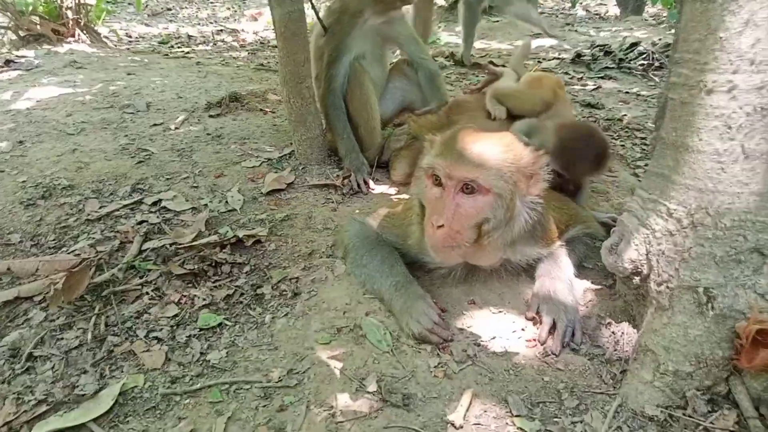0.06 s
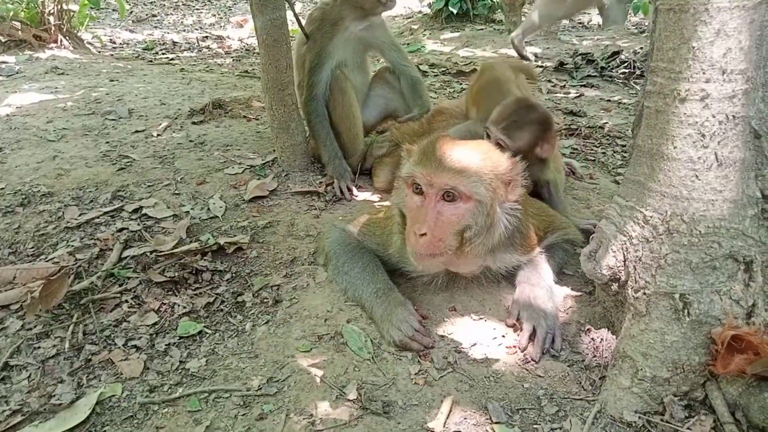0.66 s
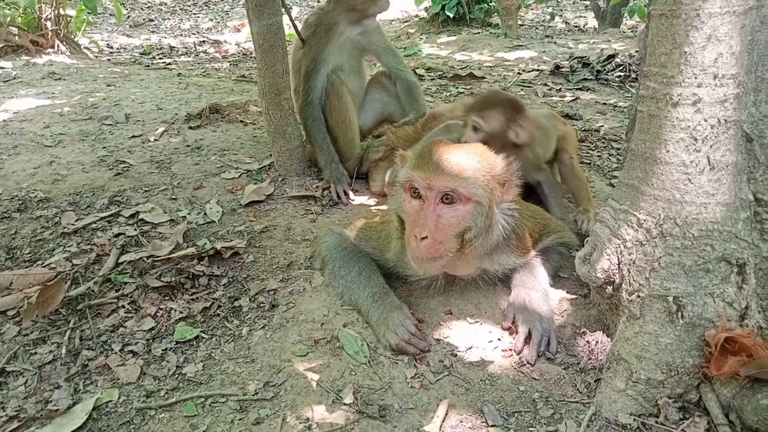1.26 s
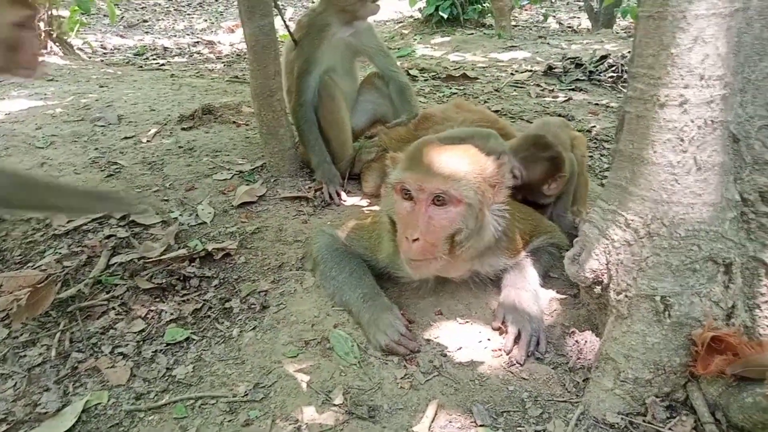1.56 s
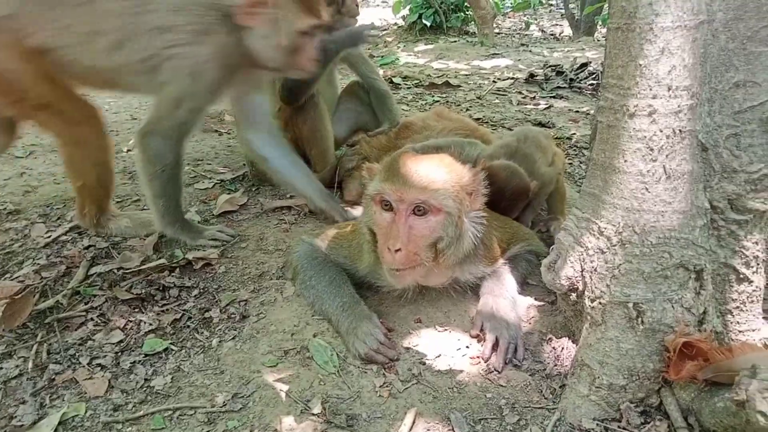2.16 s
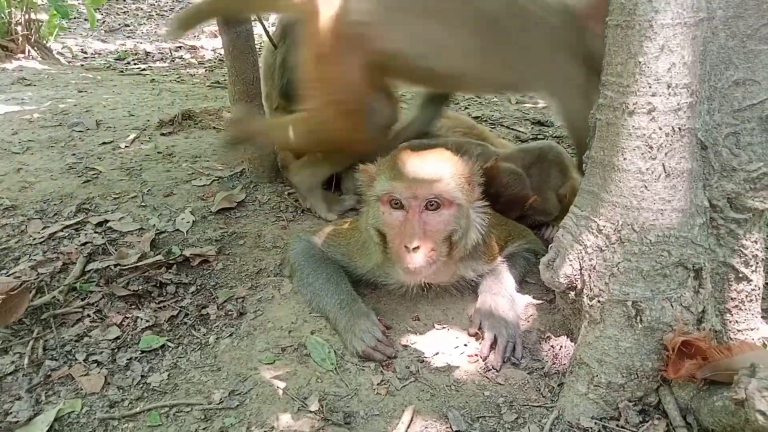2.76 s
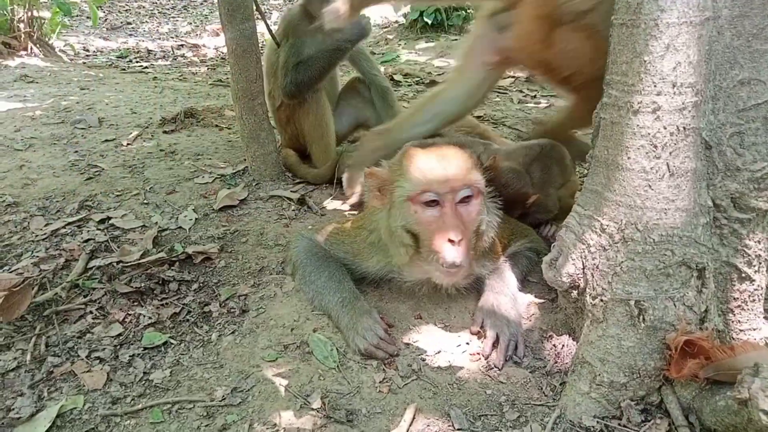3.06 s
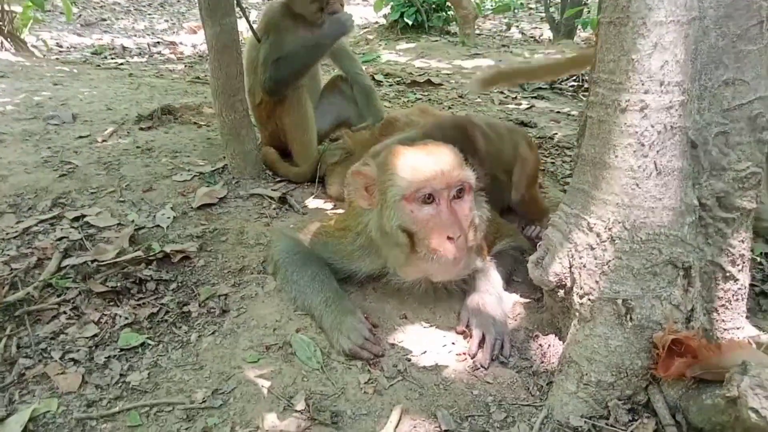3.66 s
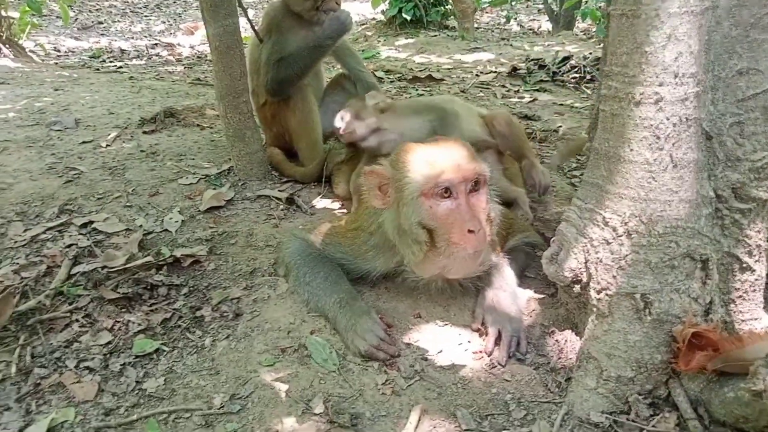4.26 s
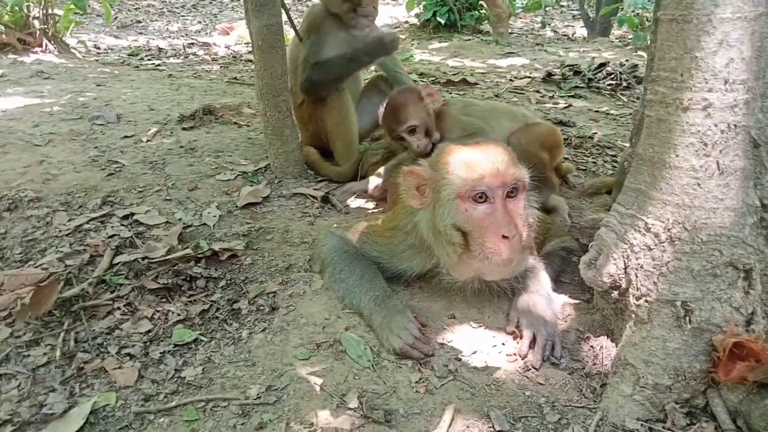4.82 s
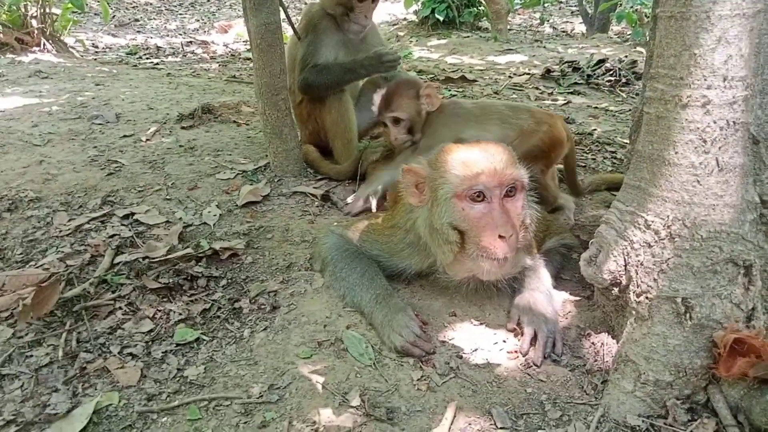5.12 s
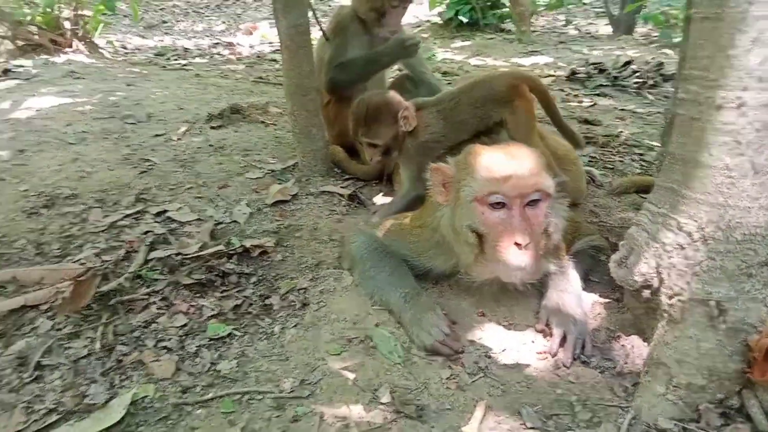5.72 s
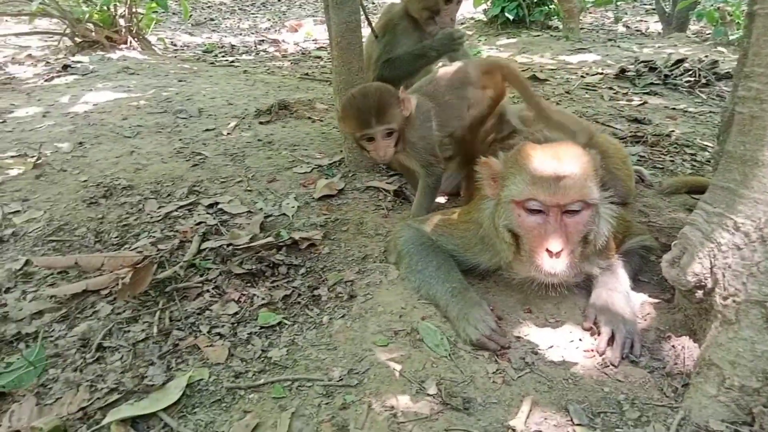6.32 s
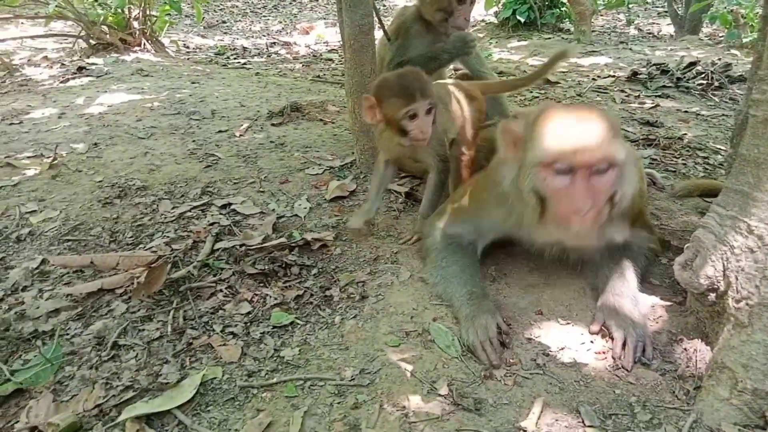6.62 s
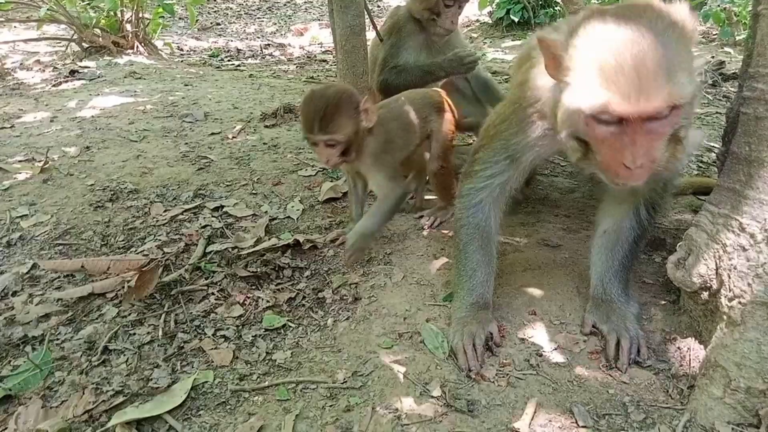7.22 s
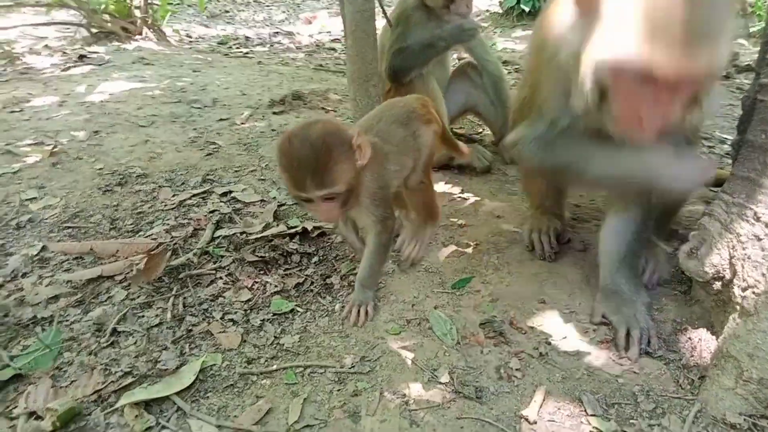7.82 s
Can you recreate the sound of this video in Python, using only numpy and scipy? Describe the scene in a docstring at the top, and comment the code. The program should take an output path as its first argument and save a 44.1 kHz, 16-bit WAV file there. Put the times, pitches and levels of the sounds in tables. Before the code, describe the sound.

Monkeys shuffle close by on a forest floor, with light scuffs, crackling dry leaves and scattered twig snaps throughout. The sharpest snap comes at about 0.8 seconds, with others around 2, 4.3, 5 to 5.3 and 6.5 seconds, and a louder stick crack near 7 seconds. A nearby bird gives nine short whistles, roughly one a second, alternating arched and falling notes, each with a brief echo. A small bird fires three very quick high chips at about 1 second and again at 5.3. A farther bird slides steeply down three times between 1 and 2 seconds, and another repeats a short phrase four times from 6.8 to 8. A distant flock twitters faintly over a quiet low rumble and airy hiss. A thin faraway whistle swells around 6 seconds, followed by a faint low hum until just after 7.

```python
"""Monkeys and birds under the trees

Monkeys shuffle about on dry leaves, which crackle, and on twigs, which snap. A near bird repeats
arched and falling whistles, others answer from deeper in the wood, a small one gives two runs of
quick chips, and a far flock twitters. The trunks scatter every call into a short tail of echoes.
A low rumble, an airy hiss, a thin whistle and a faint hum come from far away."""
import sys
import numpy as np
from scipy import signal
from scipy.fft import rfft, irfft
from scipy.io import wavfile

SR = 44100
rng = np.random.default_rng(int(sys.argv[2]) if len(sys.argv) > 2 else 0)


def int16_out(signal):
    """Quantize to a 16-bit WAV file."""
    q = np.round(np.clip(np.atleast_2d(signal).T, -1, 1) * 32767)
    wavfile.write(sys.argv[1], SR, q.astype(np.int16))


N = 356328
TIME = np.arange(N) / SR

# The throat's resonance favours the second harmonic. Each row: frequency in Hz, gain in dB.
THROAT_RESONANCE = [(1500, -24), (1850, -8), (2150, -11), (2400, 6.5), (3000, -9.5), (3700, 0),
                    (4200, -0.5), (4500, -16.5), (4900, -18.5), (5800, -14.5), (6800, -25.5), (8700, -9.5),
                    (9600, -67)]
# Foliage takes the treble out of the top harmonic. Each row: frequency in Hz, gain in dB.
FOLIAGE_LOSS = [(6000, 0), (8000, -5)]
# Notes that rise, then drop. Each row: start in seconds, top pitch in Hz, level in dB, swell in dB.
ARCHED_NOTES = [(.185, 1942, -43.5, 4.5), (2.123, 1838, -42.5, 9.5), (3.52, 1862, -42.5, 17),
                (5.258, 1867, -41, 11), (7.819, 1787, -40.5, 1)]
# Notes that only drop. Each row: start in seconds, top pitch in Hz, level in dB, swell in dB,
# linger (above 1, the note stays high for longer).
FALLING_NOTES = [(1.547, 2298, -39, 5, 1.05), (2.903, 2422, -39, 0, 1.07), (4.653, 2314, -37.5, 5.5, .9),
                 (7.305, 2296, -38.5, 0.5, 0.94)]

def near_bird():
    """Harmonics (multiples of the pitch) light up as they slide through the throat's resonance."""
    arch = np.array([.915, .99, .97, .91, .805])  # shares of the top pitch
    fall = np.array([.99, .96, .885, .775, .675])
    steps = np.linspace(0, 1, len(fall))
    notes = [(start, .148, top_hz * arch, db, swell_db, -2.5)
             for start, top_hz, db, swell_db in ARCHED_NOTES]
    notes += [(start, .168, top_hz * np.interp(steps ** linger, steps, fall), db, swell_db, -5)
              for start, top_hz, db, swell_db, linger in FALLING_NOTES]
    whistle, overtones = np.zeros(N), np.zeros(N)
    for start, length, pitches, db, swell_db, first_db in notes:
        hz, phase, loudness = note(length, pitches, swell_db, rasp=.013, attack_s=.03, release_s=.022)
        first, second, third, fourth = [
            from_db(db) * loudness * gain_at(THROAT_RESONANCE, k * hz) * np.sin(k * phase)
            for k in range(1, 5)]
        add(whistle, start, second + first * from_db(first_db + 2.5 * drift(200, len(hz))))
        add(overtones, start, third + fourth * gain_at(FOLIAGE_LOSS, 4 * hz))
    # The highest harmonics reach us mainly by bouncing off the foliage.
    direct = whistle + .22 * overtones
    echoes = from_db(-2.4) * tree_echoes(whistle + .55 * overtones, early_db=2)
    return from_db(1.24) * (direct + echoes)


# A second bird slides steeply down. Each row: start in seconds, length in seconds, first pitch in Hz,
# level in dB, swell in dB, pitch in Hz of the thin note that leads in.
SLIDING_CALLS = [(1.166, .1, 3824, -49, 4.5, 4610), (1.435, 0.093, 3943, -51.5, -20, 4330),
                 (1.735, .065, 3600, -52.5, -16, 4390)]
# A third bird repeats a phrase. Each row: start in seconds, level in dB, rasp of the main note.
REPEATED_PHRASES = [(6.778, -50, 0.039), (7.22, -50, 0.02), (7.599, -51, 0.045), (7.958, -43, 0.016)]
# Stray hoarse calls. Each row: start in seconds, length in seconds, first and last pitch in Hz,
# level in dB.
HOARSE_CALLS = [(1.337, 0.038, 3150, 3970, -53), (2.005, .061, 1400, 1586, -63.5),
                (2.352, 0.037, 1430, 1385, -64.5), (3.43, 0.083, 2550, 3120, -64),
                (3.545, 0.1, 2970, 2500, -60), (3.825, 0.045, 1737, 2174, -54),
                (5.012, 0.062, 2030, 2165, -61), (6.392, 0.13, 3264, 2630, -57.5),
                (6.478, 0.041, 2645, 1960, -56.5)]

def far_birds():
    """Calls from deeper in the wood arrive mostly as echoes."""
    calls = np.zeros(N)
    lead_in, slide = np.array([.93, 1.003, .995, .86]), np.array([1, .715, .54, .47])
    for start, length, hz, db, swell_db, lead_hz in SLIDING_CALLS:
        add(calls, start - .068, far_note(.12, lead_hz * lead_in, db=-64, rasp=.0099))
        add(calls, start, far_note(length, hz * slide, db, rasp=.018, swell_db=swell_db))
    for start, db, rasp in REPEATED_PHRASES:
        opening = far_note(.079, [3070, 3190, 3266, 3180], db - 6, rasp=.019)
        main_note = far_note(.0954, [2930, 2940, 2870, 2820], db, rasp)
        lower_voice = far_note(.1, [2586, 2460, 2310, 2200], db - 7, rasp=.11, swell_db=-9)
        add(calls, start, opening)
        add(calls, start + .062, main_note)
        add(calls, start + .062, lower_voice)
    for start, length, first_hz, last_hz, db in HOARSE_CALLS:
        add(calls, start, far_note(length, [first_hz, last_hz], db, rasp=.06))
    return from_db(3) * calls + from_db(4.5) * tree_echoes(calls, early_db=-.5)


# Two runs of three chips. Each row: start in seconds, level in dB.
CHIP_NOTES = [(.909, -50), (.937, -37.5), (.966, -37), (5.252, -48), (5.283, -38), (5.313, -37)]

def small_bird():
    """Each chip is a very fast downward sweep, and each run grows louder."""
    chips = np.zeros(N)
    pitches_hz = [6150, 5800, 4970, 4450]
    for start, db in CHIP_NOTES:
        _, phase, loudness = note(.018, pitches_hz, 0, rasp=.019, attack_s=.011, release_s=.013)
        add(chips, start, from_db(db) * loudness * np.sin(phase))
    return chips + from_db(-7.5) * tree_echoes(chips, early_db=6, tail_s=.16)


# Things that break. Each row: start in seconds, peak level in dB, ring pitch in Hz, ring width in Hz.
TWIG_SNAPS = [(0.1115, -33, 2980, 3000), (0.2772, -40, 4500, 4000), (.577, -33.5, 2800, 2500),
              (0.6832, -36, 3500, 790), (0.7627, -24, 3030, 1920), (1.702, -41, 4960, 3970),
              (1.928, -33, 6900, 1180), (1.941, -41, 3970, 3520), (1.9952, -46, 7400, 1470),
              (3.4903, -44, 8260, 2050), (4.265, -35.5, 4270, 4830), (4.431, -41.5, 5900, 1200),
              (5.019, -31, 6530, 3340), (5.0296, -31, 3580, 400), (5.305, -33.5, 1100, 460),
              (5.3059, -32.5, 2900, 1500), (6.451, -37, 4100, 1110), (6.4877, -43.5, 7740, 2000),
              (6.505, -39, 4040, 800), (7.7546, -51.5, 7650, 1500), (7.833, -38, 6000, 5000),
              (7.835, -44, 700, 700)]
# The ways one stiff stick rings. Each row: pitch in Hz, relative level in dB, width in Hz.
STICK_RINGS = [(1260, -15.5, 1700), (3080, -6.5, 2300), (7170, -2.5, 350), (8240, -1.5, 900)]

def snapping_twigs():
    """Twigs and dry leaves give way under paws; a stick cracks as the big monkey gets up."""
    snaps = np.zeros(N)
    for start, db, hz, width_hz in TWIG_SNAPS:
        add(snaps, start, snap(db, hz, width_hz))
    for hz, db, width_hz in STICK_RINGS:
        add(snaps, start=6.9355, sound=snap(db - 19, hz, width_hz))
    return snaps + from_db(-12.5) * tree_echoes(snaps, early_db=8, tail_s=.4)


# Scuffs on the ground. Each row: start in seconds, stroke length in seconds, level in dB,
# brightness in dB (light brushes hiss, heavy steps crunch).
PAW_SCUFFS = [(0.112, 0.042, -59.5, -2.5), (.163, .019, -63, -1), (.264, 0.091, -67, -11),
              (0.569, .017, -67, -6), (1.031, 0.034, -65.5, -10), (1.69, 0.047, -60.5, -0.5),
              (1.921, 0.024, -67, -4), (2.097, 0.018, -63.5, -3), (2.794, .027, -67.5, 3.5),
              (3.164, 0.052, -56, 1), (3.617, 0.069, -72.5, -10), (3.745, 0.036, -60, 2.5),
              (4.055, 0.04, -59, 7.5), (4.257, .047, -62, -1), (4.318, 0.059, -60.5, 6.5),
              (5.857, 0.073, -72.5, 5), (6.131, 0.063, -75, 11), (6.219, 0.039, -64.5, 8),
              (6.681, 0.045, -67, -2), (6.774, 0.061, -68.5, 4), (6.95, .085, -62, 7.5),
              (7.15, .037, -62.5, 0), (7.831, 0.011, -59, 3)]
# A scuff's thud, crunch, crackle and hiss. Each row: low and high edge in Hz, gain in dB,
# share of the brightness added to that gain.
SCUFF_LAYERS = [(200, 530, -3, -1.1), (580, 4000, 7, -0.95), (6160, 8700, -1, 0.32), (9600, 33000, -6.5, 1)]

def scuffing_paws():
    """Paws and bodies brush dry leaves; large and small pieces crackle in clumps that swell and die."""
    scuffs = np.zeros(N)
    for start, length, db, bright_db in PAW_SCUFFS:
        progress = np.arange(16384) / SR / length
        stroke = np.minimum(progress / .26, 1) * np.exp(-np.maximum(progress - .8, 0) / .45)
        clumps_db = 3.4 * drift(210, len(stroke))
        for low_hz, high_hz, layer_db, share in SCUFF_LAYERS:
            crunch = grains(len(stroke), spread_db=2.3)
            crunch *= from_db(clumps_db + 1.8 * drift(300, len(stroke)))
            layer = unit_level(band_pass(crunch, low_hz, high_hz))
            add(scuffs, start, from_db(db + layer_db + share * bright_db) * stroke * layer)
    return scuffs + from_db(-35) * tree_echoes(scuffs, early_db=-4, tail_s=.6)


# How strongly the fallen leaves stir. Each row: time in seconds, relative level in dB.
STIR_LEVELS = [(0.0, -71), (0.25, -75.5), (0.36, -80.5), (1.69, -85), (1.89, -86), (2.25, -84), (3.56, -85),
               (3.89, -79), (4.84, -82), (5.24, -87.5), (5.67, -82.5), (6.14, -83), (6.53, -84),
               (6.77, -97), (6.93, -75), (7.04, -77), (7.18, -85), (8.08, -89)]
# The tone of their crackle. Each row: frequency in Hz, gain in dB.
CRACKLE_TONE = [(500, -7), (2000, 13.5), (4000, 1.5), (8000, 8), (10500, -15), (14500, 6.5), (16000, -5.5)]

def stirring_leaves(tick_count=420):
    """Leaves crackle as they shift in small bursts, and single stiff ones tick at their own pitch."""
    ticks = np.zeros(N)
    low_hz, high_hz = 3000, 8500
    for when, strength, pitch in rng.random((tick_count, 3)):
        hz = low_hz * (high_hz / low_hz) ** pitch
        add(ticks, when * N / SR, snap(15.5 + 19.5 * strength ** 2, hz, width_hz=2500))
    bursts_db = 9 + 5 * drift(24, N)
    crackle = from_db(bursts_db) * with_tone(grains(N, spread_db=3.8), CRACKLE_TONE)
    level_db, = curves(STIR_LEVELS)
    return from_db(level_db) * (crackle + ticks)


# How strongly the flock twitters. Each row: time in seconds, relative level in dB.
FLOCK_LEVELS = [(0, -64), (.35, -82), (.52, -61), (1.6, -72), (2.85, -65), (3.3, -71), (3.65, -58),
                (4.3, -73), (4.9, -63.5), (5.55, -77), (5.65, -58.5), (5.8, -73), (7.1, -63), (8.08, -68)]

def far_flock(chirp_count=600):
    """Many tiny high chirps, blurred by distance."""
    chirps = np.zeros(N)
    for when, stretch, pitch in rng.random((chirp_count, 3)):
        length = .021 + .0382 * stretch
        pitches_hz = (5300 + 1000 * pitch) * np.array([1.04, 1, .96])
        _, phase, loudness = note(length, pitches_hz, 0, rasp=.0363, attack_s=.03, release_s=.0019)
        add(chirps, when * N / SR, loudness * np.sin(phase))
    level_db, = curves(FLOCK_LEVELS)
    return from_db(level_db - 5.5) * unit_level(tree_echoes(chirps, early_db=39, tail_s=.2))


# The far background. Each row: time in seconds, relative levels of rumble and of air in dB.
BACKGROUND_LEVELS = [(0.0, -61, -67), (0.22, -57.5, -63), (1.53, -57, -64.5), (2.79, -59.5, -67),
                     (3.08, -53, -62), (3.4, -59, -66), (5.4, -53.5, -64.5), (5.78, -60.5, -68),
                     (6.19, -57, -66.5), (6.88, -55.5, -64.5), (7.43, -56, -63.5), (8.08, -54, -64.5)]
# The tones of the rumble and the air. Each row: frequency in Hz, gain in dB.
RUMBLE_TONE = [(12, -51), (25, -43), (35, -38), (50, -8), (64, 0.5), (85, 2), (120, -2), (170, -6.5),
               (260, -15), (450, -58)]
AIR_TONE = [(120, 1), (250, 7), (500, 2), (900, -2), (2000, -2.5), (3200, -2), (4600, -13.5), (5700, -11),
            (7000, -29.5), (9000, -19), (10500, -32.5), (16000, -32)]

def rumble_and_air():
    """A low rumble and an airy hiss slowly rise and fall."""
    rumble_db, air_db = curves(BACKGROUND_LEVELS)
    rumble = from_db(rumble_db + .6) * with_tone(rng.standard_normal(N), RUMBLE_TONE)
    air = from_db(air_db + 5.5) * with_tone(rng.standard_normal(N), AIR_TONE)
    return rumble + air


# The whistle's path. Each row: time in seconds, pitch in Hz, relative level in dB.
WHISTLE_PATH = [(5.75, 1255, -56), (5.95, 1265, -50), (6.1, 1417, -45), (6.22, 1344, -49), (6.4, 1390, -53),
                (6.6, 1380, -61), (6.7, 1360, -99)]

def far_whistle():
    """One thin tone, heard only as echoes, holds faintly, then swells, rises and dies away."""
    hz, db = curves(WHISTLE_PATH)
    return tree_echoes(from_db(db - 18) * np.sin(phase_of(hz)), early_db=28)


# The hum's path. Each row: time in seconds, base pitch in Hz, relative level in dB.
HUM_PATH = [(6.3, 63.8, -85), (6.5, 66.1, -67.5), (6.8, 66.14, -70.5), (7.08, 66.7, -62.5),
            (7.25, 64.4, -86)]
# The tones in the hum. Each row: multiple of the base pitch, gain in dB.
HUM_HARMONICS = [(3, -0.5), (4, 6), (5, 1), (7, -6)]

def far_hum():
    """A low, wavering hum passes in about a second."""
    hz, db = curves(HUM_PATH)
    phase = phase_of(hz * (1 + .013 * drift(35, N)))
    hum = sum(from_db(gain_db) * np.sin(k * phase) for k, gain_db in HUM_HARMONICS)
    sounding = (TIME > HUM_PATH[0][0]) & (TIME < HUM_PATH[-1][0])
    return from_db(db + 2.5 + 2 * drift(26, N)) * hum * sounding


def note(length, pitches, swell_db, rasp, attack_s, release_s):
    """Pitch, phase and loudness of a glide; rasp is a fast wobble, as a share of the pitch."""
    t = np.arange(int(length * SR)) / SR
    progress, steps = t / length, np.linspace(0, 1, len(pitches))
    glide = np.polyfit(steps, np.log(pitches), len(pitches) - 1)  # a smooth curve through the pitches
    hz = np.exp(np.polyval(glide, progress)) * (1 + rasp * drift(502.6, len(t)))
    ramps = np.clip(np.minimum(t / attack_s, (length - t) / release_s), 0, 1)
    flutter_db = 2.2 * drift(160, len(t))
    loudness = np.sin(np.pi / 2 * ramps) * from_db(swell_db * (progress - .5) + flutter_db)
    return hz, phase_of(hz), loudness


def far_note(length, pitches, db, rasp, swell_db=0):
    """A far bird's note: one gliding tone without overtones."""
    _, phase, loudness = note(length, pitches, swell_db, rasp, attack_s=.25 * length, release_s=.019)
    return from_db(db) * loudness * np.sin(phase)


def snap(db, hz, width_hz):
    """A break is a millisecond of tearing fibres that makes the twig or leaf ring briefly."""
    t = np.arange(2048) / SR
    tear = rng.standard_normal(len(t)) * (.33 * np.exp(-t / .00071) + .11 * np.exp(-t / .0064))
    tear[0] = 1  # the first sharp click
    spread = 1 + .61 * width_hz / hz
    ring = band_pass(tear, hz / spread, hz * spread) + .076 * band_pass(tear, hz / 3, hz * 3)
    return from_db(db) * ring / np.abs(ring).max()


def tree_echoes(x, early_db, tail_s=.8):
    """Nearby trunks and foliage give a quick cluster of echoes; the rest fade by 60 dB in tail_s."""
    t = np.arange(int(1.5 * SR)) / SR
    fade = from_db(-60 * t / tail_s) + from_db(early_db - 60 * t / .14)
    build_up = 1 - np.exp(-t / .015)
    echoes = band_pass(grains(len(t), spread_db=6.8) * fade * build_up, 500, 7300)
    echoes /= np.sqrt(np.mean(np.abs(rfft(echoes, SR)[2000:4500]) ** 2))  # gain 1 over 2000-4500 Hz
    return signal.fftconvolve(x, echoes)[:N]


def grains(size, spread_db):
    """Dense clicks of very uneven strength."""
    return rng.standard_normal(size) * from_db(spread_db * np.minimum(rng.exponential(1, size), 5))


def drift(per_second, size):
    """A random wander of about 1 either way."""
    return np.interp(np.arange(size) * per_second / SR, np.arange(4096), rng.standard_normal(4096))


def band_pass(x, low_hz, high_hz):
    """Gently keep what lies between two frequencies; the top one is capped at 0.45 * SR."""
    sections = signal.butter(2, [low_hz, min(high_hz, .45 * SR)], "band", fs=SR, output="sos")
    return signal.sosfilt(sections, x + 1e-18)


def with_tone(x, tone):
    """Shape a sound's lows and highs with a tone table, at level 1."""
    gains = gain_at(tone, np.fft.rfftfreq(len(x), 1 / SR))
    return unit_level(irfft(rfft(x) * gains, len(x)))


def gain_at(tone, hz):
    """Look up a tone table's gain at these frequencies."""
    table_hz, db = np.transpose(tone)
    return from_db(np.interp(np.log(hz + 1e-9), np.log(table_hz), db))


def curves(rows):
    """Join timed rows with straight lines, one curve per column."""
    times, *columns = np.transpose(rows)
    return [np.interp(TIME, times, column) for column in columns]


def phase_of(hz):
    """How far a wave has turned, in radians."""
    return 2 * np.pi * np.cumsum(hz) / SR


def from_db(db):
    """Turn decibels into a gain."""
    return 10 ** (np.asarray(db) / 20)


def unit_level(x):
    """Scale to an average (rms) level of 1."""
    return x / np.sqrt(np.mean(x ** 2) + 1e-20)


def add(track, start, sound):
    """Mix a sound in at a start time in seconds."""
    i = max(round(start * SR), 0)
    track[i:i + len(sound)] += sound[:max(N - i, 0)]


def scene():
    """Birds above, monkeys on the leaves below, far sounds behind, in one channel."""
    birds = near_bird() + far_birds() + small_bird() + far_flock()
    monkeys = snapping_twigs() + scuffing_paws() + stirring_leaves()
    background = rumble_and_air() + far_whistle() + far_hum()
    return (birds + monkeys + background)[None]


def record(dry):
    """Steeply cut the treble above 15650 Hz."""
    return signal.sosfilt(signal.ellip(10, .2, 70, 15650, fs=SR, output="sos"), dry)


dry = scene()
out = record(dry)
int16_out(out)
```